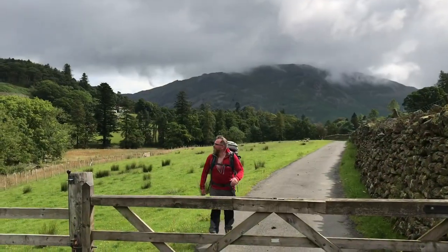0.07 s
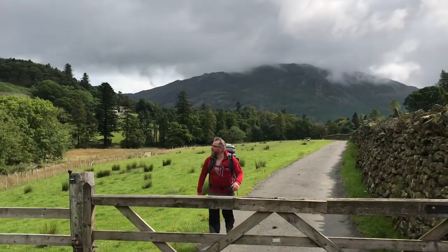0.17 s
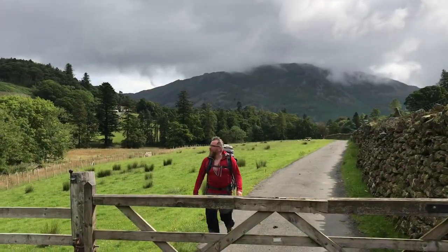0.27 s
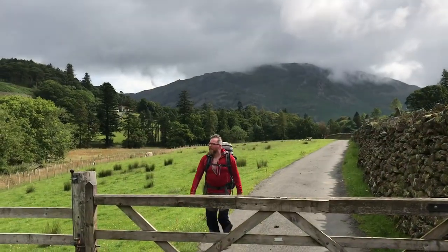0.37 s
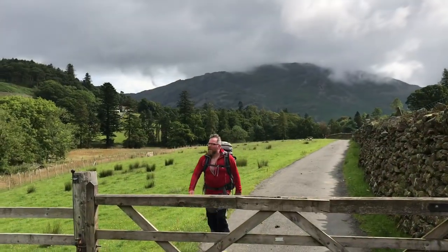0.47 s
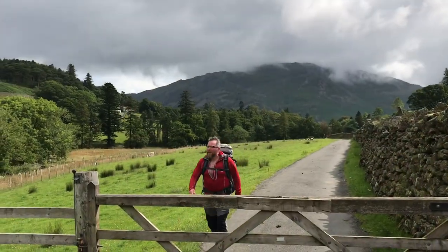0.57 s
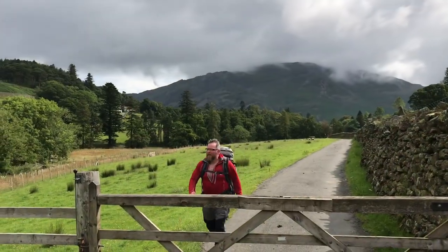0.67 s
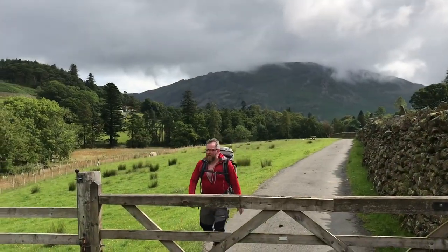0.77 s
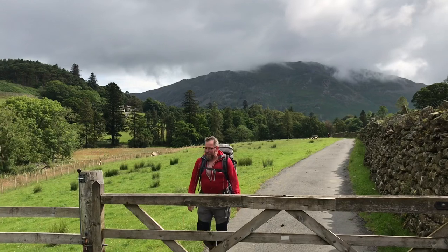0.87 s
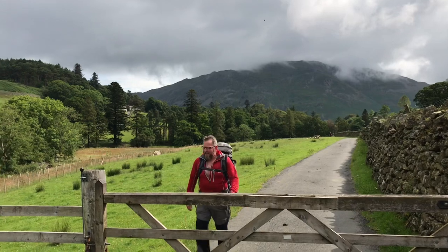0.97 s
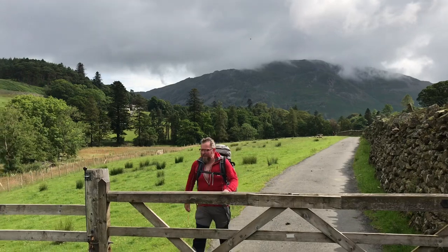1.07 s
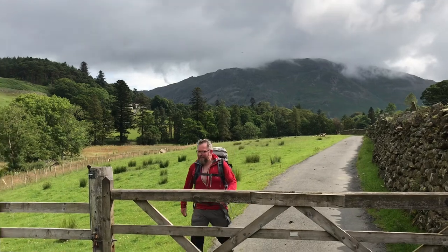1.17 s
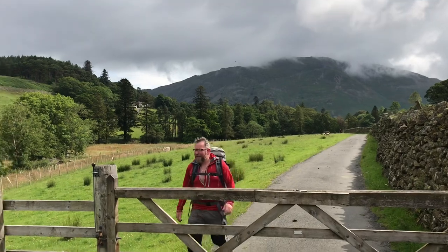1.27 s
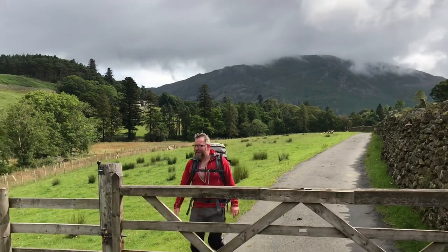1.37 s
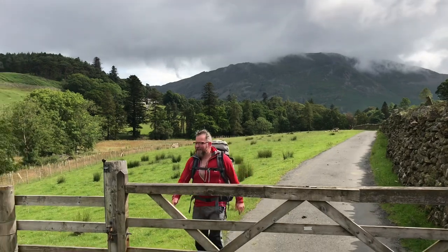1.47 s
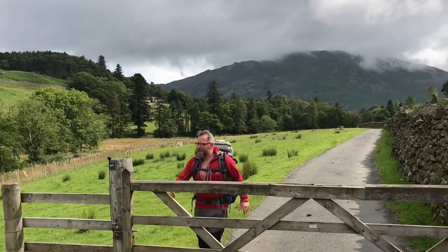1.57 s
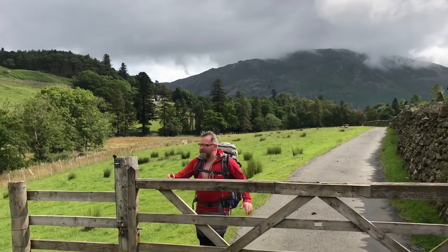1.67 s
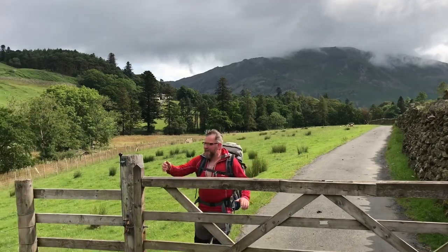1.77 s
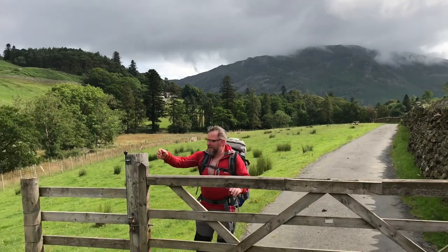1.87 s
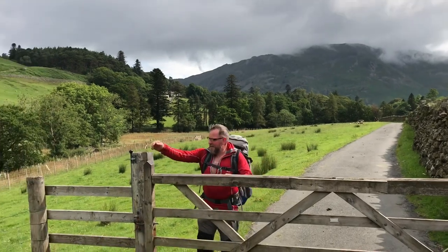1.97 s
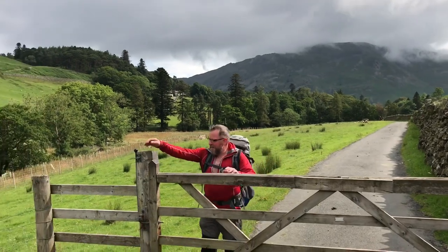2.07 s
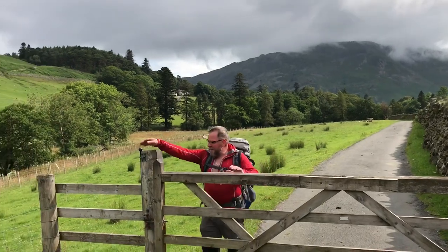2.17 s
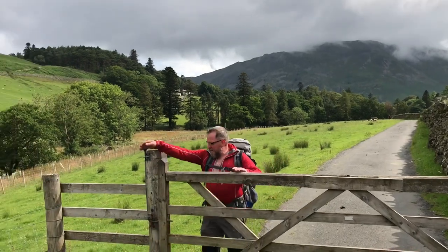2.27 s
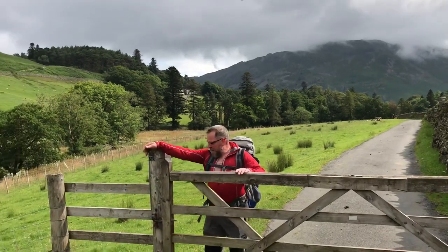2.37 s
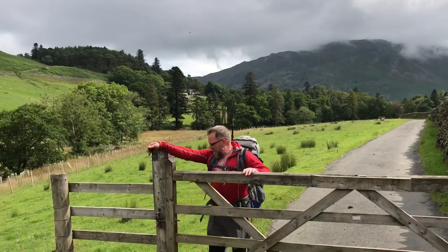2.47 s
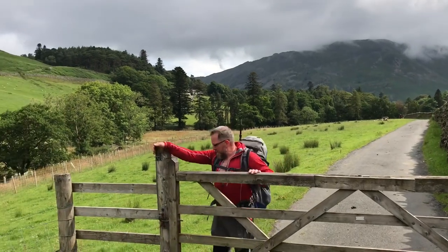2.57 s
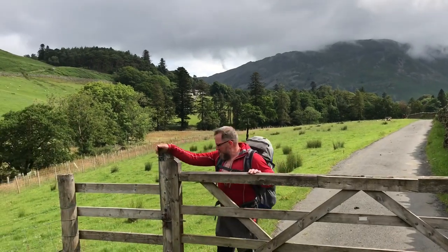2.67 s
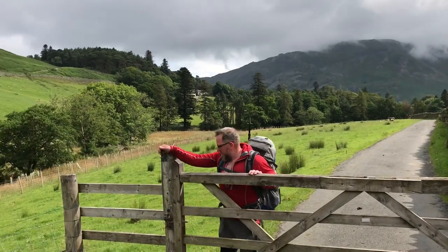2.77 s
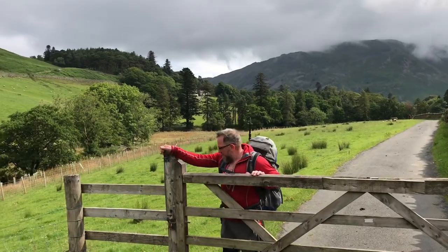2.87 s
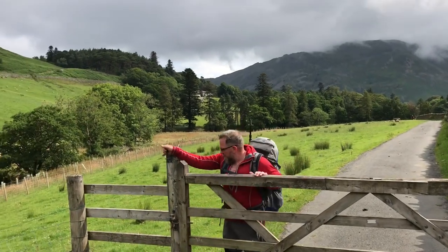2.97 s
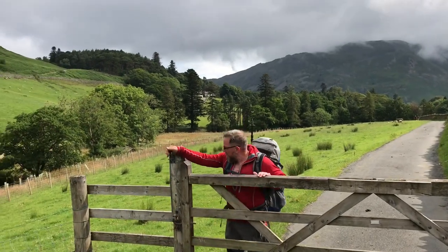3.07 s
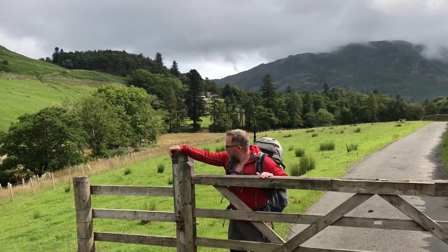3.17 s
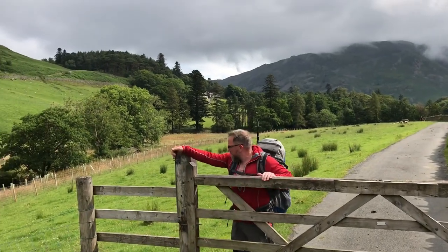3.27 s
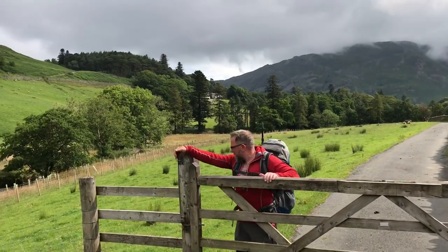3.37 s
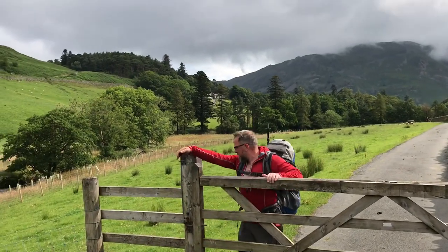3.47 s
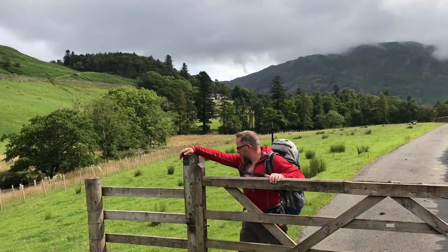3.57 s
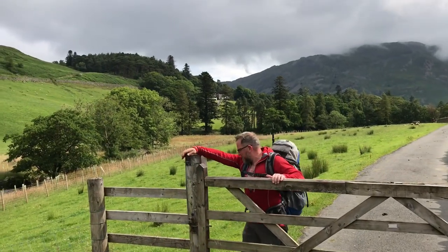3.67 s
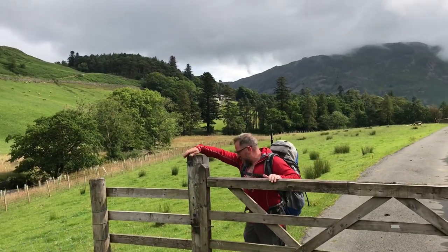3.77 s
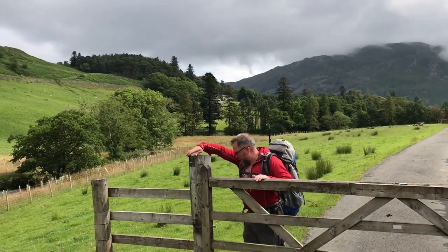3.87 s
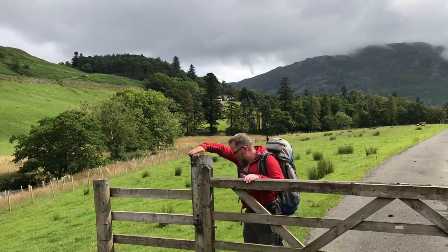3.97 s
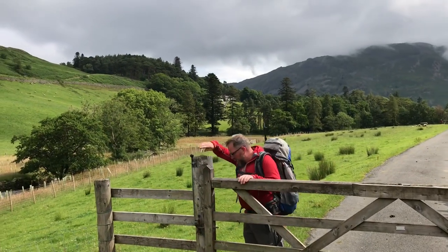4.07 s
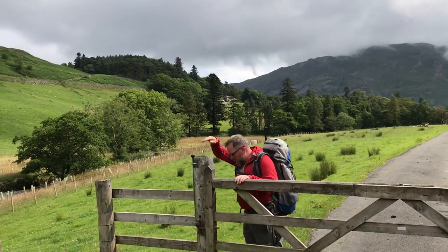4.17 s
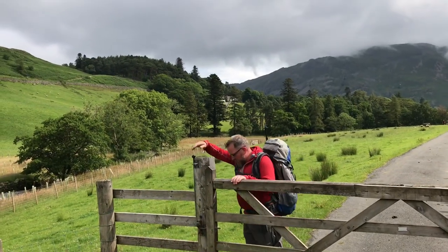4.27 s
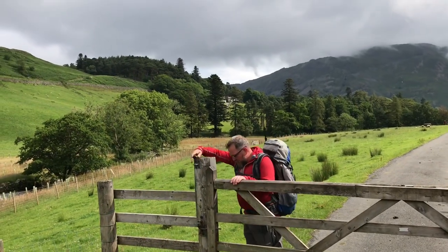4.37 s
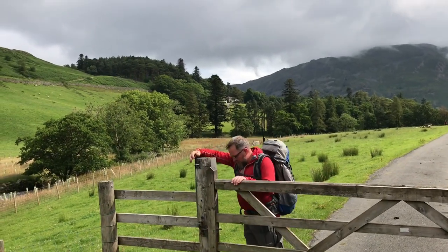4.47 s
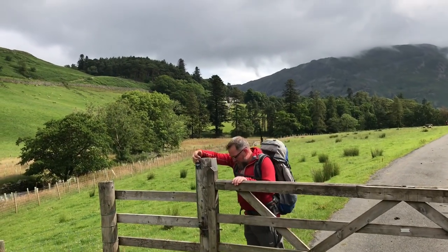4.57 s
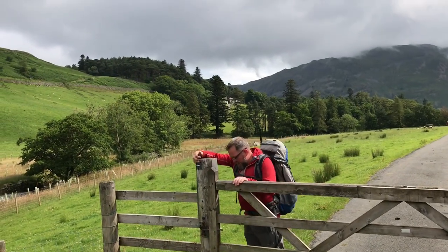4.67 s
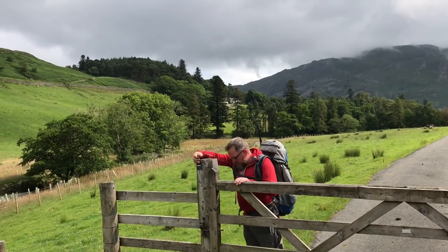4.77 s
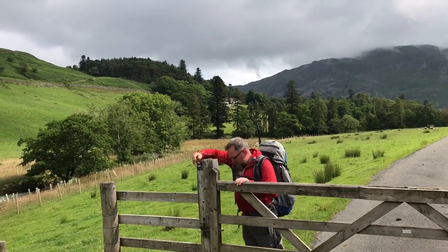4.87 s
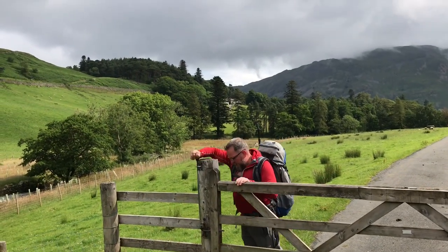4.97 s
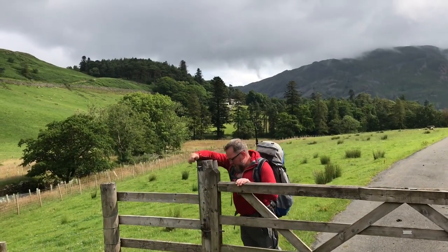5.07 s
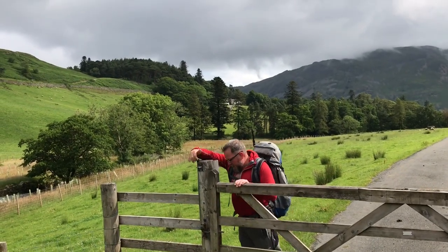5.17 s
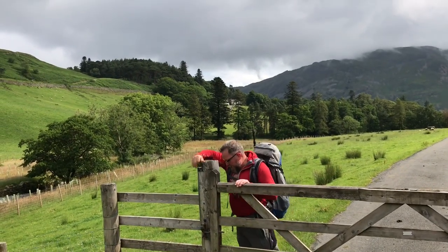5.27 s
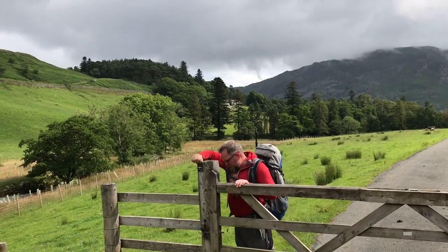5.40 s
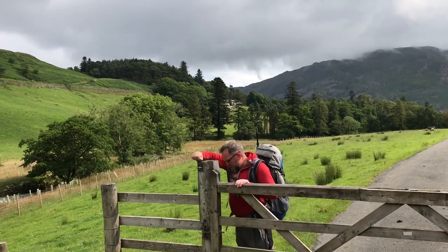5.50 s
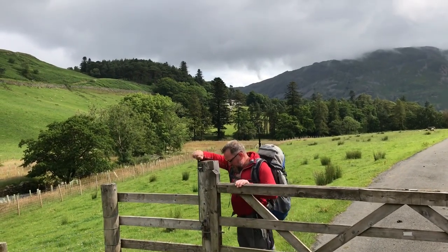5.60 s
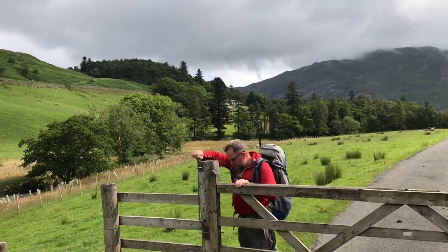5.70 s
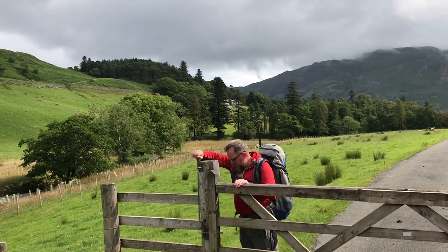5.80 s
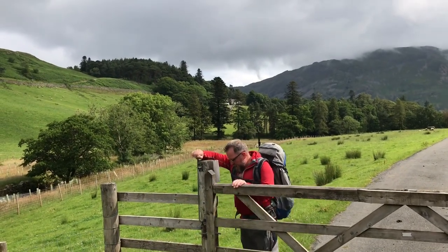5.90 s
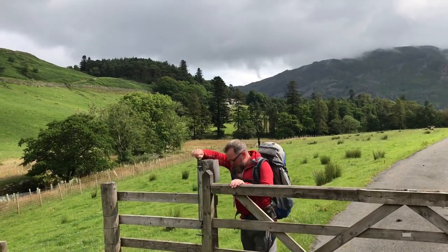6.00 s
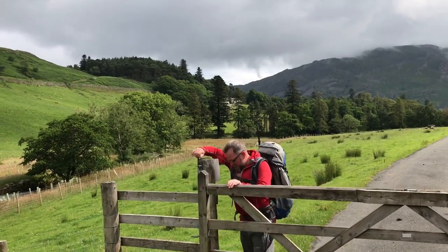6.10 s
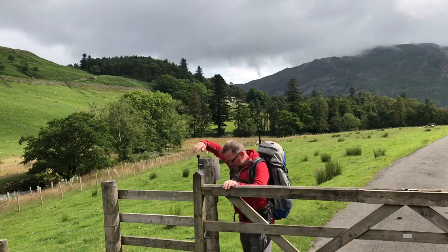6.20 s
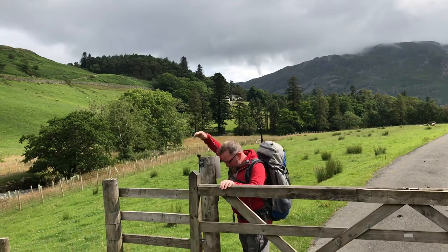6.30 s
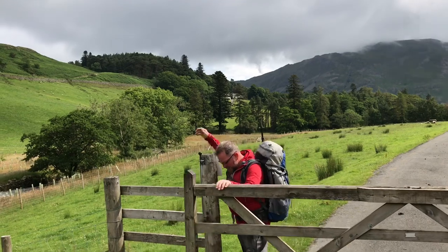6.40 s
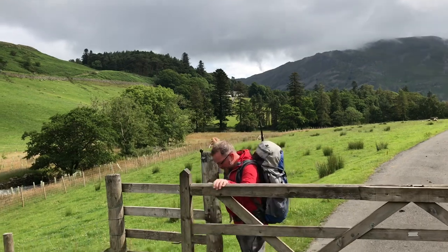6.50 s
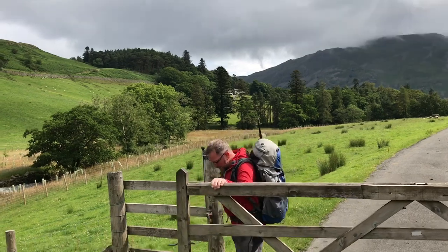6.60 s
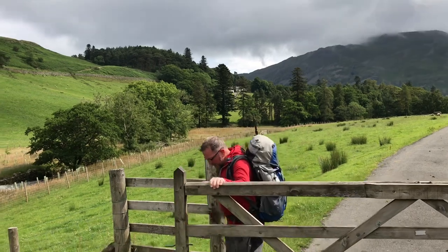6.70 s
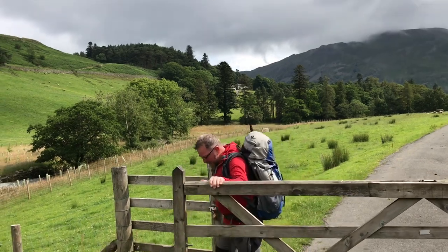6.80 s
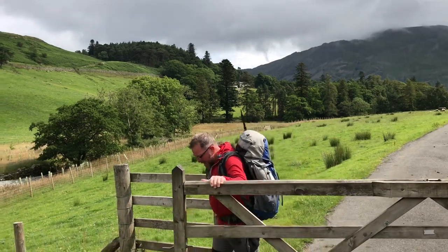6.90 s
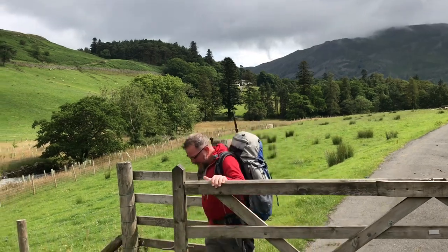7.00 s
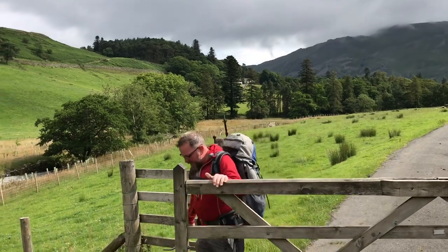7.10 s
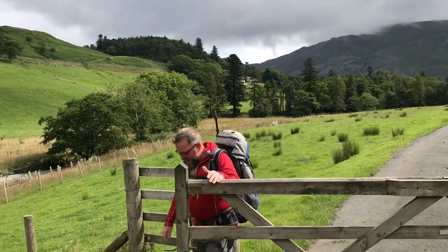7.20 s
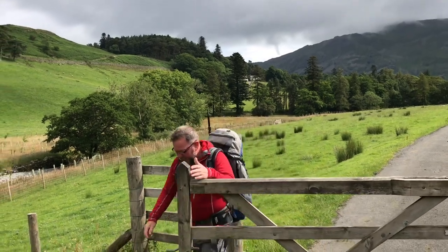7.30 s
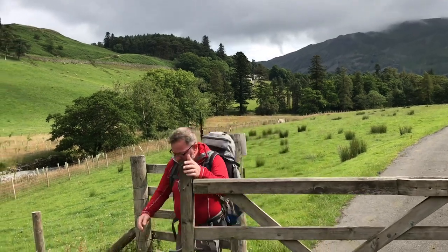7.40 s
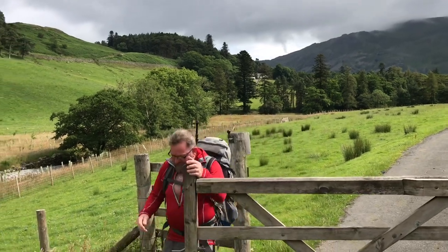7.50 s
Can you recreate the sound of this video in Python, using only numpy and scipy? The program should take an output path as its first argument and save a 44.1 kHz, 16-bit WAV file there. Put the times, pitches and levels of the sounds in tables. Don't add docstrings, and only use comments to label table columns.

```python
import sys
import numpy as np
from scipy import signal
from scipy.fft import rfft, irfft
from scipy.io import wavfile
from scipy.ndimage import uniform_filter1d

SR = 44100
rng = np.random.default_rng(int(sys.argv[2]) if len(sys.argv) > 2 else 0)


def attenuation_scalar(level_db):
    decades = np.asarray(level_db, float) / 20
    return 10 ** decades


def waveform_to_disk(signal):
    frames = np.transpose(np.atleast_2d(signal))
    scaled = np.clip(frames, -1, 1) * 32767
    samples = np.round(scaled).astype(np.int16)
    wavfile.write(sys.argv[1], SR, samples)


N = 332778


def rms_one(x):
    return x / np.sqrt(np.mean(x ** 2) + 1e-20)


def drift(rate):
    r = np.exp(-80 * np.pi * rate / SR)
    slow = signal.lfilter([1], [1, -2 * r, r * r], rng.standard_normal(N // 40 + 2002))[2000:]
    return np.interp(np.arange(N) / 40, np.arange(len(slow)), rms_one(slow))


def ring(force, hz, t60):
    r, w = attenuation_scalar(-60 / (t60 * SR)), 2 * np.pi * hz / SR
    gain = np.sin(w) * np.sqrt(2 - 2 * r * r)
    return signal.lfilter([0, gain], [1, -2 * r * np.cos(w), r * r], force + 1e-18)


def band(x, low_hz, high_hz, order=2):
    return signal.sosfilt(signal.butter(order, [low_hz, high_hz], "band", fs=SR, output="sos"), x)


def colour(x, spectrum):
    hz, level_db = np.transpose(spectrum)
    grid = np.linspace(1, SR / 2, 513)
    cepstrum = irfft(np.log(attenuation_scalar(np.interp(np.log(grid), np.log(hz), level_db))))
    cepstrum[1:512] *= 2
    cepstrum[513:] = 0
    taps = irfft(np.exp(rfft(cepstrum)))
    return signal.oaconvolve(x, taps / np.sqrt(np.sum(taps ** 2)))[:N]


def tone(rows, start=0, gain_db=0, octave_db=-30, rough=0.):
    s, hz, level_db = np.transpose(rows)
    t = np.arange(s[0], s[-1], 1 / SR)
    phase = 2 * np.pi * np.cumsum(np.interp(t, s, hz)) / SR
    ends = np.clip(np.minimum(t - s[0], s[-1] - t) / .002, 0, 1)
    flutter = 1 + rough * np.sqrt(40) * uniform_filter1d(rng.standard_normal(len(t)), size=40)
    wave = np.sqrt(2) * (np.sin(phase) + attenuation_scalar(octave_db) * np.sin(2 * phase))
    out, first = np.zeros(N), round((start + s[0]) * SR)
    out[first:first + len(t)] = wave * ends * flutter * attenuation_scalar(np.interp(t, s, level_db) + gain_db)
    return out


def note(start, length, first_hz, last_hz, level_db, early, rise_db, fall_db):
    crest = start + 0.28 * length
    crest_hz = first_hz + early * (last_hz - first_hz)
    return [(start, first_hz, level_db - rise_db),
            (crest, crest_hz, level_db),
            (start + length, last_hz, level_db - fall_db)]


def field():
    # frequency in Hz, density in dB per Hz.
    hiss_shape = [(150, -26), (434, -8.5), (1500, -10), (4250, -18.5), (5000, -22.5), (10500, -28),
                  (15300, -20), (16500, -12)]
    hiss = colour(rng.standard_normal(N) * attenuation_scalar(1.0 * drift(6.0)), hiss_shape)
    ticks = (rng.random(N) < 14 / SR) * attenuation_scalar(6.4 * np.minimum(rng.exponential(1, N), 2))
    ticks = signal.lfilter([1], [1, -.985], ticks) * rng.standard_normal(N)
    return attenuation_scalar(-60) * (hiss + attenuation_scalar(-9.0) * band(ticks, 8000, 16000))


def wind():
    # time in seconds, rumble in dB.
    gusts = [(0.0, -57), (1.39, -54), (1.89, -59), (2.04, -54.5), (3.76, -60), (3.91, -45.5), (4.05, -54.5),
             (4.35, -36), (4.45, -44.5), (4.77, -42), (5.2, -48), (5.74, -40.5), (5.86, -55.5), (6.2, -60),
             (6.51, -45.5), (7.17, -41), (7.34, -54.5), (7.52, -43.5)]
    # start in seconds, peak in dB, pitch in Hz.
    eddies = [
        (0.018, -46, 70),
        (0.192, -44, 110),
        (0.747, -39.5, 172),
        (1.229, -42.5, 64),
        (1.567, -31, 76),
        (1.675, -35.5, 69.7),
        (4.339, -28.5, 96.5),
    ]
    t = np.arange(N) / SR
    rumble_db = np.interp(t, *np.transpose(gusts))
    lumps = drift(13.6)
    rumble = rms_one(band(rng.standard_normal(N) * attenuation_scalar(3.8 * lumps), 46.0, 107.0))
    upper = rms_one(band(rng.standard_normal(N) * attenuation_scalar(11.7 * lumps), 176, 327))
    upper_db = -19 + 0.045 * (rumble_db + 6.0)
    out = attenuation_scalar(rumble_db) * (rumble + attenuation_scalar(upper_db) * upper)
    for start, peak_db, hz in eddies:
        age = np.clip(t - start, 0, None)
        sweep = 2 * np.pi * hz * (0.563 * age + 0.0099 * (1 - np.exp(-age / 0.0049)))
        onset = np.sin(np.pi / 2 * np.clip(age / 0.0055, 0, 1)) ** 2
        out += attenuation_scalar(peak_db) * np.sin(sweep) * np.exp(-age / 0.017) * onset
    return signal.sosfilt(signal.butter(2, 32.0, "high", fs=SR, output="sos"), out)


def outdoors(x, echo_db, scatter_db, t60):
    # delay in seconds, level in dB.
    echoes = [
        (.011, -11),
        (0.021, -14.5),
        (.034, -35),
    ]
    age = np.arange(SR // 2) / SR
    response = rng.standard_normal(len(age)) * attenuation_scalar(-60 * age / t60) * np.clip(age / 0.0068, 0, 1)
    response = attenuation_scalar(scatter_db) * response / np.sqrt(np.sum(response ** 2))
    for delay, level_db in echoes:
        first = round(delay * SR)
        response[first:first + 160] += attenuation_scalar(level_db + echo_db) * rng.standard_normal(160) / np.sqrt(160)
    response[0] = 1
    return signal.oaconvolve(x, response)[:N]


def bird_whistles():
    # start in seconds, length in seconds, first Hz, last Hz, level in dB rms.
    slides = [
        (0.853, .075, 4950, 4100, -71),
        (0.997, 0.079, 4880, 3920, -66.5),
        (1.117, 0.024, 7300, 6800, -64),
        (1.433, .035, 3900, 4770, -61.5),
        (2.794, .014, 8750, 8150, -62),
        (2.807, 0.185, 8100, 7280, -52),
        (4.639, 0.017, 5350, 4940, -54),
        (4.936, 0.035, 3610, 3100, -52.5),
    ]
    # start in seconds, length in seconds, first Hz, last Hz, dB rms.
    settled = [
        (2.672, 0.069, 3880, 3790, -50.5),
    ]
    # time in seconds, frequency in Hz, level in dB rms.
    glides = [
        [(1.498, 6440, -66), (1.515, 6440, -58.5), (1.535, 7100, -65), (1.558, 6880, -66), (1.582, 6420, -65),
         (1.6, 6400, -83)],
        [(3.034, 6130, -66), (3.042, 6850, -50), (3.052, 6530, -48), (3.078, 5330, -49.5), (3.085, 5300, -72)],
        [(3.514, 6200, -58), (3.527, 7120, -50.5), (3.557, 7180, -53), (3.585, 6500, -45.5), (3.607, 6160, -53),
         (3.612, 5800, -71)],
        [(4.234, 8050, -70), (4.24, 7830, -60), (4.25, 8030, -60), (4.275, 8240, -66), (4.304, 8130, -63),
         (4.332, 7620, -58), (4.345, 7300, -66)],
        [(1.279, 5300, -66), (1.29, 5800, -61), (1.34, 5950, -60), (1.355, 5750, -70), (1.375, 5580, -65),
         (1.392, 5520, -68)],
        [(4.37, 5600, -52.5), (4.39, 4200, -55), (4.405, 3600, -57), (4.435, 3140, -60)],
        [(4.487, 5560, -56), (4.495, 6860, -50.5), (4.509, 7650, -64), (4.537, 8430, -66), (4.6, 7570, -61),
         (4.612, 7350, -70)],
        [(6.07, 6340, -66), (6.08, 7100, -55), (6.093, 7100, -55), (6.116, 6230, -57.5)],
    ]
    # time in seconds, frequency in Hz, level in dB rms.
    arches = [
        [(5.035, 7550, -67), (5.061, 7142, -47), (5.081, 6963, -47), (5.141, 6900, -48), (5.155, 6886, -59),
         (5.16, 7044, -80)],
        [(4.764, 5773, -69), (4.774, 5678, -54), (4.784, 5488, -46), (4.81, 5427, -45), (4.854, 5336, -54),
         (4.865, 5393, -65)],
    ]
    notes = [note(*row, early=0.28, rise_db=7, fall_db=7.5) for row in slides]
    notes += [note(*row, early=0.64, rise_db=13, fall_db=7.5) for row in settled]
    out = sum(tone(rows, octave_db=-34, rough=0.038) for rows in notes + glides)
    for rows, octave_db in zip(arches, [-25.0, -35.0]):
        out += tone(rows, octave_db=octave_db, rough=.03)
    return out


def bird_trills():
    # seconds after its start, frequency in Hz, level in dB rms.
    down = [(.007, 5850, -49.5), (.025, 4870, -52), (.042, 4050, -50.5), (.047, 4166, -53)]
    up = [(.005, 4530, -66), (.012, 4900, -52.5), (.028, 5680, -49), (.045, 5900, -56), (.056, 6070, -60)]
    rise = [(.005, 4330, -79), (.009, 4250, -55), (.03, 4400, -48), (.043, 4600, -47), (.055, 5200, -47),
            (.066, 5900, -51), (.069, 5820, -75)]
    fall = [(.004, 5160, -75), (.008, 5390, -55.5), (.02, 4840, -54.5), (.034, 4050, -53),
            (.039, 4120, -50)]
    buzz = [(.0045, 7200, -74), (.006, 6880, -60), (.009, 5060, -54), (.0105, 4250, -63), (.011, 4220, -98),
            (.017, 5900, -72), (.021, 5400, -68), (.026, 4700, -70), (.029, 4400, -69)]
    down_at = [(1.6207 + .1605 * k, -2 - 1.45 * abs(k - 4.0)) for k in range(7)]
    up_at = [(s + 0.063, db - 2.0) for s, db in down_at[:6]]
    rise_at = [(3.6552 + .1147 * k, -4) for k in range(5)]
    fall_at = [(5.2355 + .069 * k, -6 * (k == 5)) for k in range(12)]
    buzz_at = [(3.1015 + .029 * k, -11 + .75 * k - 2.5 * (k % 2 == 0)) for k in range(14)]
    out = np.zeros(N)
    for shape, starts in [(down, down_at), (up, up_at), (rise, rise_at), (fall, fall_at), (buzz, buzz_at)]:
        for s, gain_db in starts:
            out += tone(shape, s, gain_db, octave_db=-33, rough=0.19)
    return out


def pings():
    # start in seconds, peak in dB, pitch in Hz.
    clicks = [(.1855, -41, 600), (.2665, -48, 800), (.5155, -44, 2700), (1.2558, -46, 1600),
              (6.561, -42, 3800), (6.6065, -52, 2500), (6.6615, -38, 7000), (6.816, -50, 4000),
              (6.835, -54, 2700), (7.018, -48, 2500), (7.396, -47, 1800), (7.489, -46, 1900),
              (7.125, -46, 1700), (4.927, -40, 400), (4.893, -46, 6000)]
    # first slip in seconds, period in seconds, slips, peak in dB, pitch in Hz.
    judders = [
        (2.8183, .0105, 3, -42, 2700),
        (3.955, .0128, 8, -53, 1800),
    ]
    out, age = np.zeros(N), np.arange(800) / SR
    slips = []
    for s, period, count, peak_db, hz in judders:
        for k in range(count):
            slips.append((s + k * period * rng.uniform(.95, 1.05), peak_db, hz * rng.uniform(.88, 1.12)))
    for start, peak_db, hz in clicks + slips:
        cycles = attenuation_scalar(-60 * age * hz / 9.9) * np.sin(2 * np.pi * hz * age)
        edge = attenuation_scalar(-60 * age / .001)
        out[round(start * SR):][:800] += attenuation_scalar(peak_db) * (.6 * cycles + .8 * edge)
    return out


def creak():
    slip_s = [5.9568, 5.9622, 5.9682, 5.9742, 5.98, 5.9872, 5.996, 6.007, 6.016, 6.029]
    # frequency in Hz, level in dB, t60 in seconds.
    modes = [(1706, -6, 0.054), (2400, -9.5, .008), (2910, -2, 0.01), (7200, -15.5, 0.011),
             (8600, -14.5, 0.0028), (11400, -29, .004)]
    s, k = np.array(slip_s), np.arange(len(slip_s))
    ticks, clicks = np.zeros((2, N))
    ticks[np.round((s - .002) * SR).astype(int)] = attenuation_scalar(-52 + 2.1 * k)
    clicks[np.round(s * SR).astype(int)] = attenuation_scalar(-25.5 + 0.34 * k)
    body = sum(attenuation_scalar(mode_db) * ring(clicks, hz, t60) for hz, mode_db, t60 in modes)
    high = ring(ticks, 11500, 0.003) + ring(np.roll(ticks, shift=40), 12600, .005)
    return band(body + high, 1200, 12000)


def squeals():
    # start in seconds, length in seconds, first Hz,
    # last Hz, level in dB rms.
    rubbing = [(4.117, 0.017, 3700, 3750, -53), (4.985, 0.021, 1620, 1543, -40.5),
               (5.011, 0.043, 454, 454, -44.5), (5.557, 0.024, 1445, 1370, -50),
               (5.609, 0.028, 1400, 1810, -50), (5.646, 0.02, 1600, 1640, -46),
               (5.656, 0.013, 10500, 10260, -32), (6.168, .022, 3600, 3560, -66),
               (6.177, .016, 3080, 2750, -60), (6.2, .062, 2620, 2440, -63), (6.274, .017, 2800, 3580, -62),
               (6.288, .035, 3620, 3600, -62)]
    # start in seconds, length in seconds, first Hz, last Hz, level in dB rms.
    whines = [
        (5.638, 0.019, 10500, 10400, -25),
        (6.404, 0.035, 5430, 5490, -45.5),
    ]
    out = np.zeros(N)
    for row in rubbing:
        out += tone(note(*row, early=.78, rise_db=-3.5, fall_db=5), octave_db=-38.0, rough=0.49)
    for row in whines:
        out += tone(note(*row, early=.5, rise_db=16, fall_db=13), octave_db=-38, rough=0.45)
    return out


def scrape(grains_per_s=2700.0, size_db=8.0):
    # start in seconds, end in seconds, level in dB rms.
    drags = [(2.835, 2.9, -50.5), (2.908, 2.935, -45.5), (3.87, 4.053, -72), (5.099, 5.173, -58),
             (5.259, 5.447, -54.5), (5.587, 5.672, -49.5), (5.948, 6.046, -52), (4.974, 5.006, -50),
             (4.998, 5.047, -44), (6.331, 6.446, -39.5), (6.63, 6.742, -57)]
    # start in seconds, end in seconds, dB rms, centre in Hz.
    rubs = [(3.92, 3.965, -58, 700), (3.9, 4.055, -62, 1800), (4.12, 4.155, -52, 1300),
            (4.18, 4.215, -54, 1800), (5.105, 5.14, -60, 1300), (5.16, 5.19, -54, 1500),
            (5.585, 5.66, -57, 1600), (6.32, 6.35, -52, 1400), (6.42, 6.53, -58, 1200),
            (2.915, 2.95, -50, 900), (2.965, 3.0, -56, 1500), (3.1, 3.14, -56, 1200),
            (2.955, 2.985, -55, 400), (3.094, 3.125, -55, 400), (2.562, 2.59, -60, 300),
            (3.036, 3.065, -57, 500), (6.351, 6.368, -38, 650)]
    width = 1.35
    t = np.arange(N) / SR
    slips = rng.random(N) < grains_per_s * attenuation_scalar(4.0 * drift(40)) / SR
    slips = slips * attenuation_scalar(size_db * np.minimum(rng.exponential(1, N), 2))
    grain = signal.lfilter([1], [1, -.97], slips) * rng.standard_normal(N)
    drag = np.zeros(N)
    for start, end, level_db in drags:
        swell = np.sin(np.pi * np.clip((t - start) / (end - start), 0, 1))
        drag += attenuation_scalar(level_db) * np.sqrt(swell + 1e-9)
    out = drag * rms_one(band(grain, 510, 2900, order=3))
    for start, end, level_db, hz in rubs:
        span = slice(round(start * SR), round(end * SR))
        rub = rms_one(band(grain[span], hz / width, hz * width))
        out[span] += attenuation_scalar(level_db) * np.sin(np.linspace(0, np.pi, len(rub))) ** .7 * rub
    return out


def bursts(s, length, grit_db, chatter_db=3.0):
    age = np.arange(4000) / SR
    grit = rng.standard_normal((len(s), 4000)) * attenuation_scalar(grit_db * rng.exponential(1, (len(s), 4000)))
    bounce = rms_one(uniform_filter1d(rng.standard_normal((len(s), 4000)), size=70, axis=1))
    grit = rms_one(grit) * attenuation_scalar(chatter_db * bounce * np.clip(age / 0.0082, 0, 1))
    bite = np.clip(age / np.minimum(.3 * length[:, None], .0015), 0, 1)
    decay = np.exp(-(age / np.clip(length, .001, .04)[:, None]) ** 1.23)
    shapes = grit * decay * bite
    where = (np.round(s * SR).astype(int)[:, None] + np.arange(4000)).ravel()
    return lambda level_db: np.bincount(where, (shapes * attenuation_scalar(level_db)[:, None]).ravel(), N)[:N]


def spring():
    # frequency in Hz, level in dB, t60 in seconds.
    steel = [(6085, -17, .06), (6584, -17, .05), (8420, -17, .07), (9082, -19, .07), (10280, -16, .05),
             (10970, -19, .25), (11460, -21, .06), (12210, -22, .1), (13120, -14, .05), (14570, -13, .07),
             (14790, -18, .08), (15080, -14, .17), (15450, -15, .08), (15710, -19, .06)]
    # time in seconds, level in dB.
    snaps = [
        (6.3502, -26),
        (6.375, -28.5),
        (6.394, -41),
    ]
    # start in seconds, level in dB, t60 in seconds.
    rings = [(2.849, -29, 0.028), (2.9568, -30, 0.03), (2.9575, -38, 0.03), (3.0965, -29.5, 0.035),
             (3.096, -36, 0.03), (4.533, -41.5, 0.085), (4.533, -36.5, 0.042), (4.656, -38, 0.11),
             (4.654, -26, 0.05), (4.655, -32, 0.042), (5.009, -13.5, 0.026), (5.01, -17, 0.045),
             (5.282, -23, 0.037), (5.3, -49, 0.18), (5.3, -54, .15), (5.323, -29, 0.026),
             (5.358, -44, 0.13), (5.358, -52, .1), (5.358, -29, .03), (5.385, -34, .05),
             (5.411, -31, 0.045), (5.664, -33.5, 0.089), (5.662, -44, 0.1), (5.662, -31, 0.074),
             (5.663, -23.5, 0.054), (5.666, -28.5, .04), (5.666, -33.5, 0.11), (5.664, -36, 0.12),
             (6.356, -21.5, 0.17), (6.352, -39, 0.3), (6.352, -38, 0.27), (6.352, -31, 0.28),
             (6.36, -34, .15), (6.461, -35.5, .025), (3.04, -55, .03), (2.237, -46.5, .04),
             (1.256, -49, 0.056), (6.244, -63, .2), (2.912, -42, .04), (.517, -56, .03)]
    ring_hz = [13030, 985, 1453, 985, 1389, 2080, 3700, 3273, 4484, 6982, 14800, 3630, 1400, 10960, 12650,
               3500, 10990, 15080, 3553, 3750, 3650, 8559, 7908, 6132, 3591, 1174, 1868, 2003, 3621, 12450,
               12625, 14152, 4300, 3100, 1800, 1440, 990, 6370, 4200, 2750]
    s, snap_db = np.transpose(snaps)
    force = bursts(s, np.full(len(s), .008), grit_db=1.5)(snap_db + 9.5)
    out = sum(attenuation_scalar(mode_db) * ring(force, hz, t60) for hz, mode_db, t60 in steel)
    age = np.arange(SR // 2) / SR
    for hz, (start, level_db, t60) in zip(ring_hz, rings):
        decay = attenuation_scalar(-60 * age / t60)
        twin_hz = hz - rng.uniform(50, 220)
        pair = np.sin(2 * np.pi * hz * age) + .4 * decay * np.sin(2 * np.pi * twin_hz * age)
        out[round(start * SR):][:SR // 2] += attenuation_scalar(level_db) * decay * np.clip(age / .001, 0, 1) * pair
    return out


def latch(spread_db=5.0, favour_db=9.0):
    # frequency in Hz, level in dB, t60 in seconds.
    timber = [(433, -32, 0.12), (683, 4, 0.048), (974, -17, 0.041), (1149, 5, 0.038), (1285, 3, 0.037),
              (1460, 4, 0.031), (1633, 9, 0.014), (1893, 5, 0.021), (2000, 3, 0.018), (2390, 2.5, 0.024)]
    # frequency in Hz, level in dB, t60 in seconds.
    bar = [(2600, -6, 0.011), (3280, -8, 0.034), (3630, -3.5, 0.0074), (4080, -15.5, 0.02)]
    # frequency in Hz, density in dB per Hz.
    crack_shape = [(2650, -57), (4500, -49), (5020, 5), (6200, 9.5), (7750, 6), (14600, 7), (15800, 3),
                   (16500, -9.5)]
    # time in seconds, steel crack peak in dB,
    # wood knock in dB re crack, latch bar in dB re crack, wood pitch in Hz.
    strikes = [(2.5654, -42, 0.5, 6, 1530), (2.8491, -27, -2.5, 1, 1460), (2.875, -23.5, -5, -4, 1300),
               (2.909, -30, -11, -3, 1390), (3.017, -39.5, -3, 9.5, 1260), (4.089, -37.5, 6, 18, 1566),
               (4.5315, -27, -16.5, -3.5, 2000), (4.6537, -13, -9, 0, 1149),
               (4.9786, -23, -13.5, 4.5, 1676), (5.0085, -16, -15, -1, 1460),
               (5.2668, -24.5, -7.5, 7, 1460), (5.281, -24.5, -3.5, 3, 1480), (5.298, -25.5, -4.5, -1, 544),
               (5.322, -28, -3.5, 10, 1700), (5.3574, -24.5, -10.5, 7, 1540), (5.385, -35, 0, 8, 690),
               (5.3955, -18, -12, -1, 1665), (5.4105, -23.5, -7, 1, 1130), (5.4263, -23.5, -6.5, -8, 1713),
               (5.4979, -34, 2, 11.5, 1460), (5.6609, -14, -21, -8.5, 1149), (6.3501, -13, -9, -5, 1960),
               (6.3753, -16.5, -16.5, 2, 1640), (6.461, -36.5, -3.5, 8.5, 1460)]
    # time in seconds, knock peak in dB, pitch in Hz.
    wood_knocks = [(2.2367, -46, 1460), (2.958, -29, 974), (3.0389, -35, 1460), (3.096, -29.5, 980),
                   (3.923, -41, 686), (4.1245, -36.5, 1280), (4.4978, -42, 1030), (4.601, -47, 1700),
                   (4.651, -47, 1920), (4.7619, -44.5, 1100), (4.925, -42, 456), (5.506, -32, 1090),
                   (5.587, -47, 1300), (5.028, -33, 1149), (4.283, -50.5, 1460), (6.108, -49, 1110),
                   (6.1728, -45.5, 1120), (6.2433, -38.5, 686)]
    # time in seconds, crack peak in dB, wood knock in dB re crack.
    light = [(2.523, -39, -26), (2.599, -44, -11), (2.6643, -46, -15), (2.71, -28.5, -18),
             (2.926, -37.5, -5), (3.8461, -24.5, -22), (3.8637, -41.5, -8), (3.9016, -34, -21),
             (4.112, -34, -10.5), (4.1751, -30, -12), (4.19, -38.5, -2.5), (4.3246, -40, -11.5),
             (4.4104, -40, -12), (4.907, -30, -18), (5.1673, -40, -3), (5.633, -29, -18),
             (6.3213, -40.5, -5), (6.3958, -21.5, -10.5), (6.6385, -47.5, 1.5), (6.6454, -29, -16),
             (6.7022, -31.5, -18.5), (6.7932, -40.5, -11.5), (4.459, -46.5, -15), (4.592, -48, -20),
             (4.744, -49.5, -11), (6.341, -36, -6)]
    # time in seconds, crack peak in dB, wood knock in dB re crack.
    flicks = [(2.860, -38, -14), (2.8845, -34, -16), (2.931, -38, -12), (3.444, -50, -22),
              (3.731, -50, -20), (3.757, -46, -8), (3.765, -50, -20), (3.925, -42, -14), (4.096, -36, -4),
              (4.928, -36, -14), (5.1543, -32, -20), (5.194, -42, -8), (5.2025, -34, -21),
              (5.587, -49, -12), (6.656, -36, -17), (6.6685, -34, -17), (6.6882, -35, -19),
              (6.7122, -36, -15), (6.488, -48, -4)]
    # time in seconds, peak in dB.
    hard_starts = [(2.877, -26), (4.6542, -13), (5.010, -11), (5.284, -24), (5.6625, -5), (6.3525, -7),
                   (5.42, -30), (5.435, -30), (5.51, -36), (2.919, -36)]
    tick_wood_hz = 1604
    stir_db = -45
    # (s, crack dB, wood re crack, bar re crack, wood Hz, rub length s); harder blows rub longer.
    blows = [(*row, 0.0075 * attenuation_scalar(0.27 * (row[1] + 29))) for row in strikes]
    knocks = [(s, knock_db + stir_db, -stir_db, 6, hz, 0.0073) for s, knock_db, hz in wood_knocks]
    touches = []
    for rows, rub_s in [(light, 0.006), (flicks, .003)]:
        for s, crack_db, wood_db in rows:
            touches.append((s, crack_db, wood_db, wood_db / 2 + 7.0, tick_wood_hz, rub_s))
    spikes = [(s, crack_db, -20.0, -8.0, tick_wood_hz, 0.0037) for s, crack_db in hard_starts]
    s, crack_db, wood_db, bar_db, wood_hz, length = np.transpose(blows + knocks + touches + spikes)
    force = bursts(s, length, grit_db=1.37)
    chance = spread_db * rng.normal(0, 1, (len(s), 40)).T
    edges = np.geomspace(4000, 19000, 11)
    crack = np.zeros(N)
    for low_hz, high_hz, luck_db in zip(edges, edges[1:], .35 * chance[20:]):
        crack += band(force(crack_db - 8 + luck_db), low_hz, high_hz)
    out = colour(crack, crack_shape)
    out += band(force(crack_db + wood_db - 7.0), 500, 2800)
    out += band(force(crack_db + bar_db - 7.5), 2140, 3930)
    for (hz, mode_db, t60), luck_db in zip(timber, chance):
        near_db = favour_db * np.exp(-(np.log(hz / wood_hz) / 0.066) ** 2)
        out += ring(force(crack_db + wood_db + mode_db + near_db + 0.46 * luck_db - 21.0), hz, t60)
    for (hz, mode_db, t60), luck_db in zip(bar, chance[10:]):
        out += ring(force(crack_db + bar_db + mode_db + 0.91 * luck_db - 19.0), hz, t60)
    return band(out, 340, 19500, order=3)


def scene():
    air = wind() + field()
    bird = bird_whistles() + bird_trills()
    gate = latch() + spring() + scrape() + creak() + pings() + squeals()
    near = outdoors(gate, echo_db=-20.0, scatter_db=-10.5, t60=0.068)
    far = outdoors(bird, echo_db=1, scatter_db=-8, t60=0.21)
    return (near + far + air)[None]


def roll_off(x):
    return signal.sosfilt(signal.butter(12, 17200, fs=SR, output="sos"), x)


def record(dry):
    cut = signal.sosfilt(signal.cheby2(12, 32, 16100, fs=SR, output="sos"), dry)
    return roll_off(cut)


dry = scene()
out = record(dry)
waveform_to_disk(out)
```